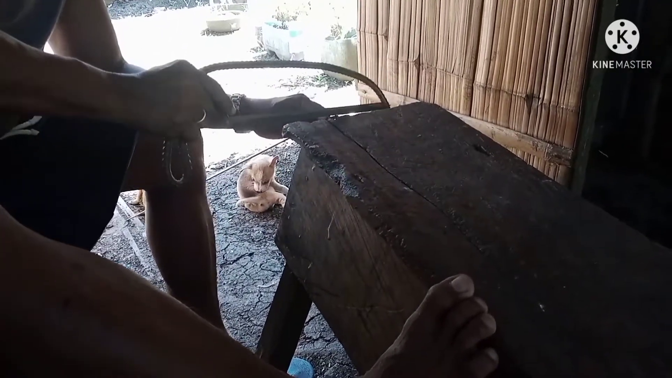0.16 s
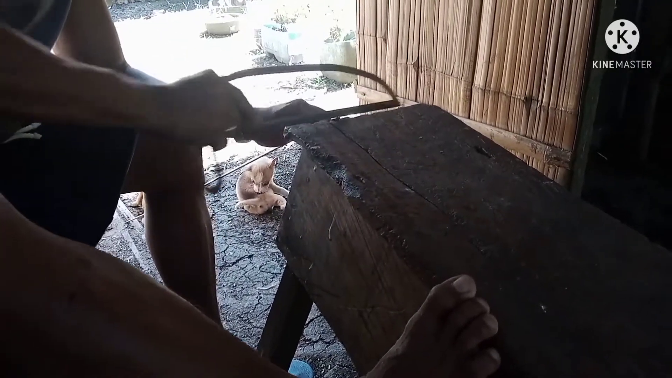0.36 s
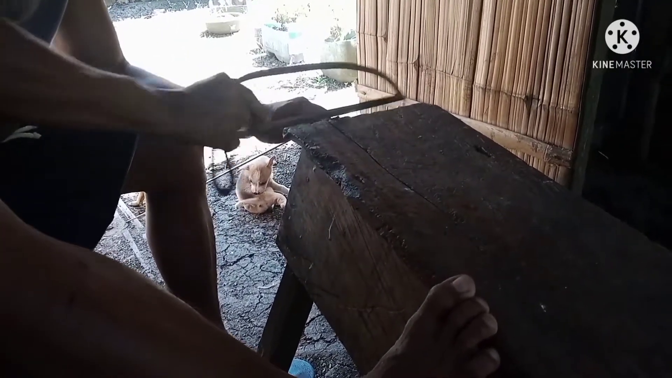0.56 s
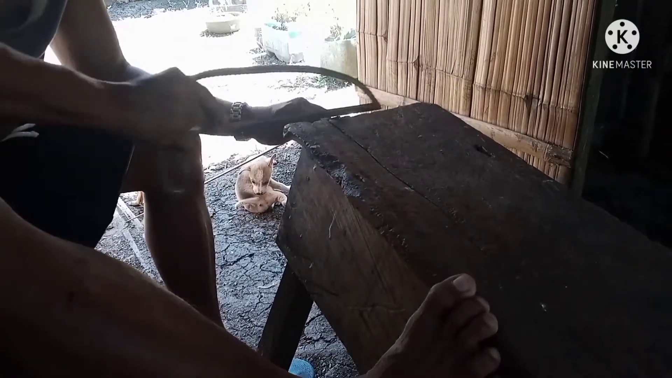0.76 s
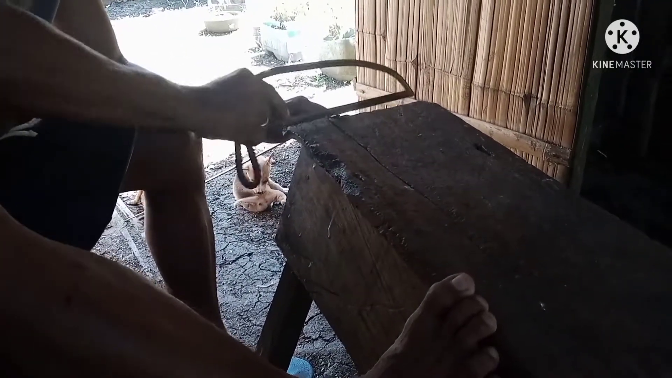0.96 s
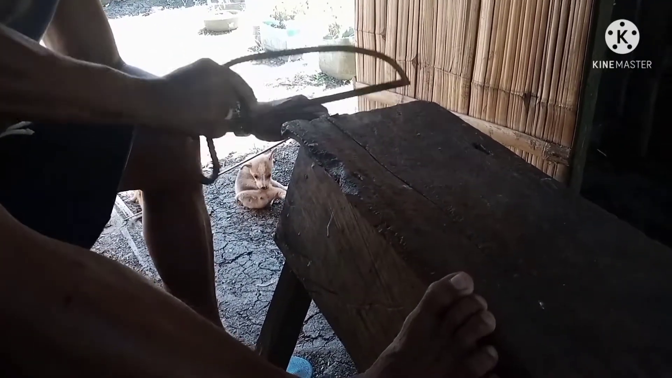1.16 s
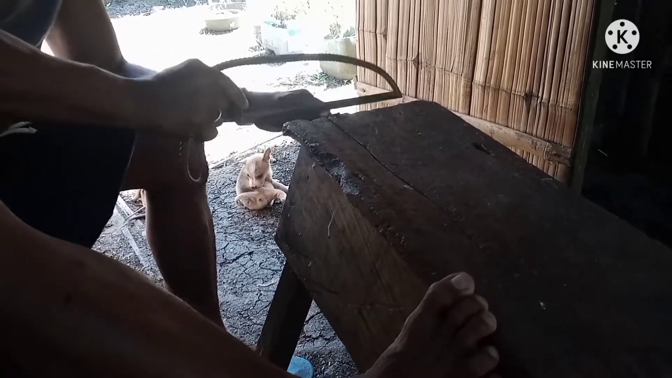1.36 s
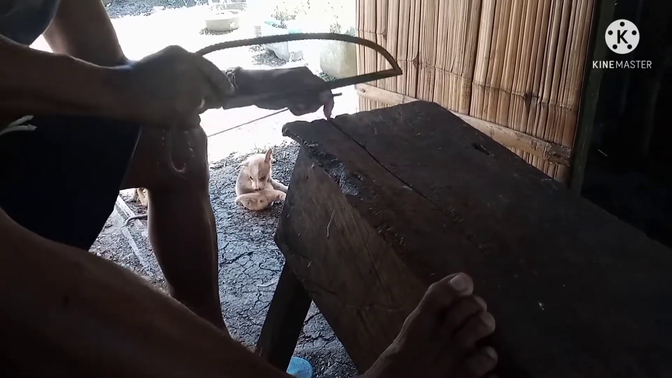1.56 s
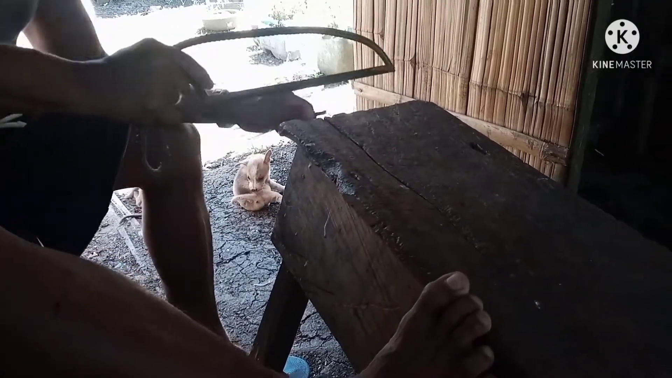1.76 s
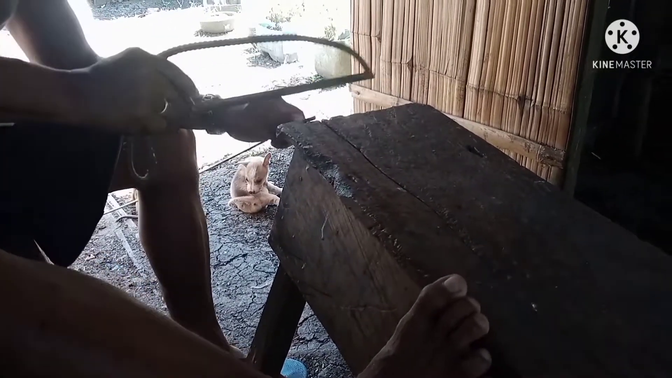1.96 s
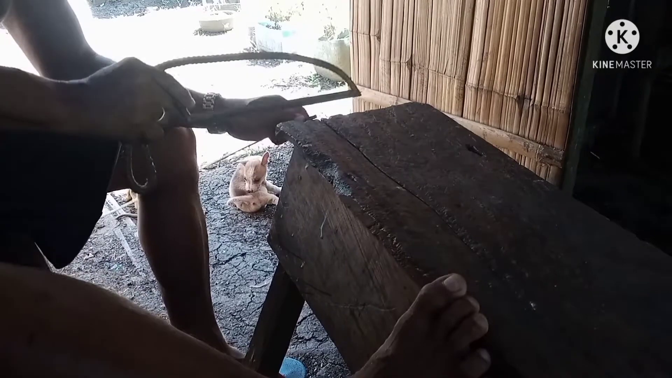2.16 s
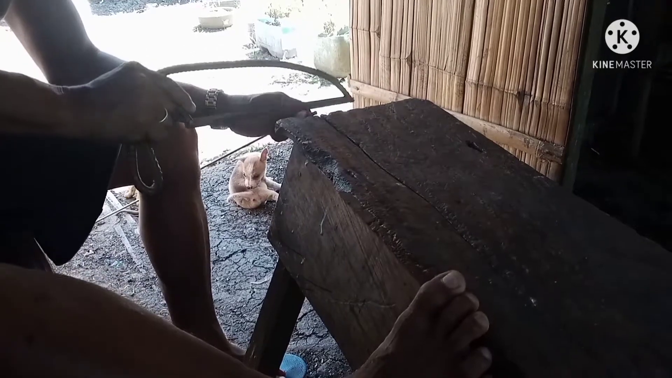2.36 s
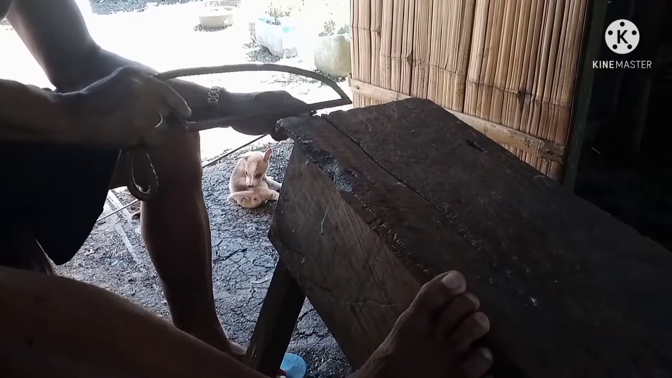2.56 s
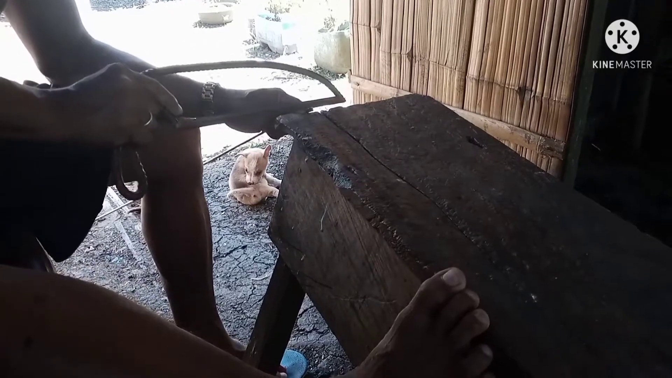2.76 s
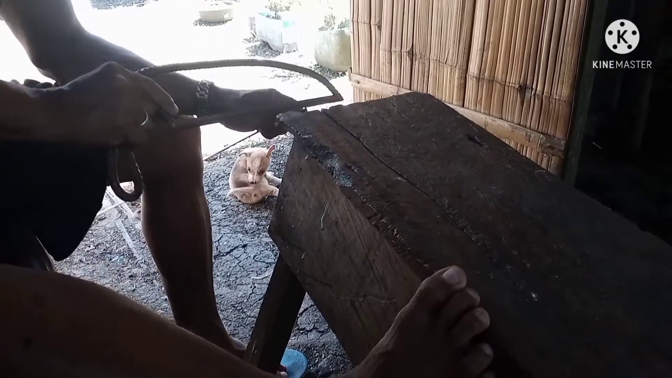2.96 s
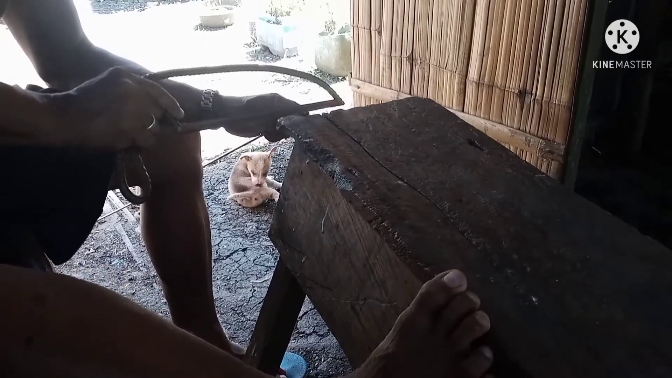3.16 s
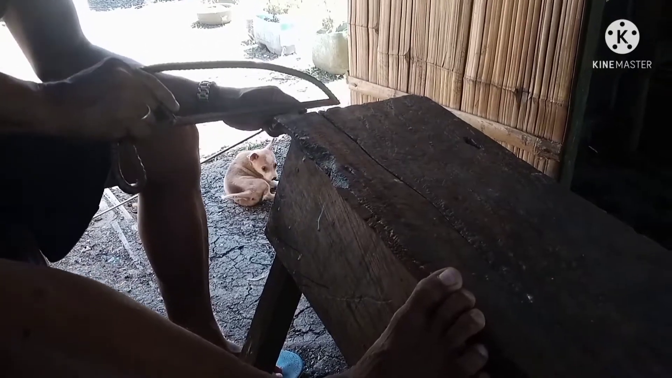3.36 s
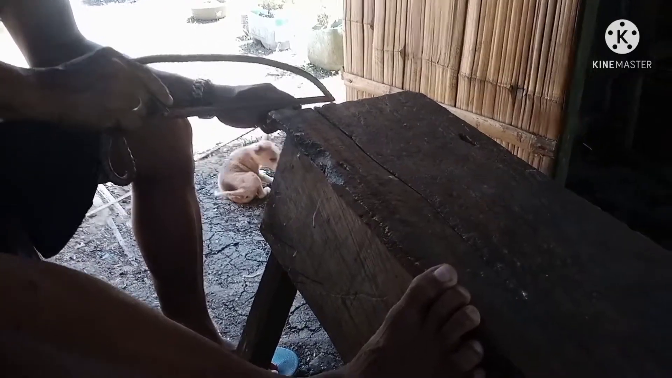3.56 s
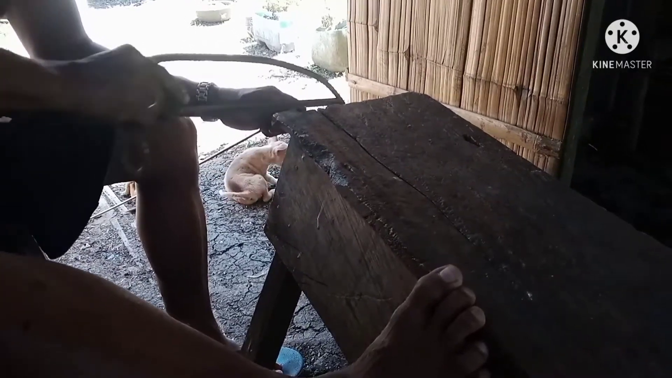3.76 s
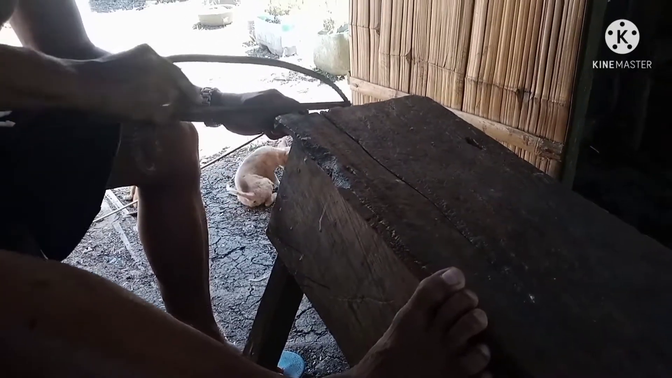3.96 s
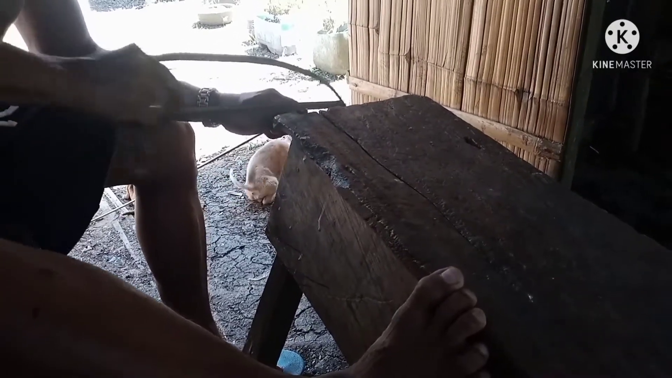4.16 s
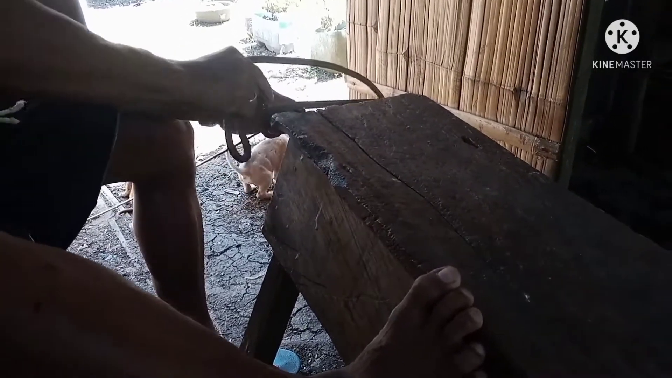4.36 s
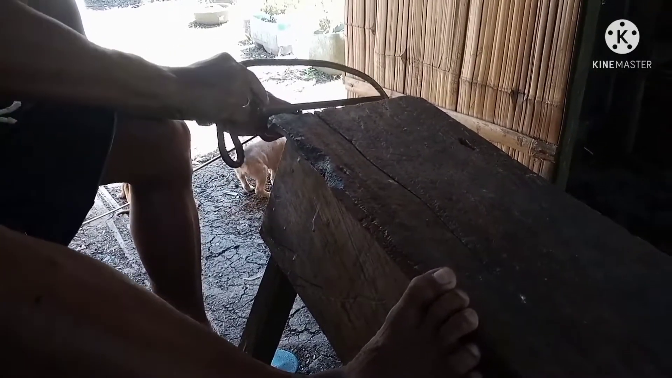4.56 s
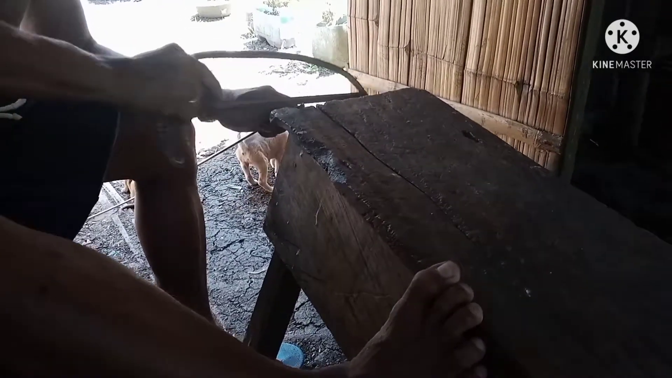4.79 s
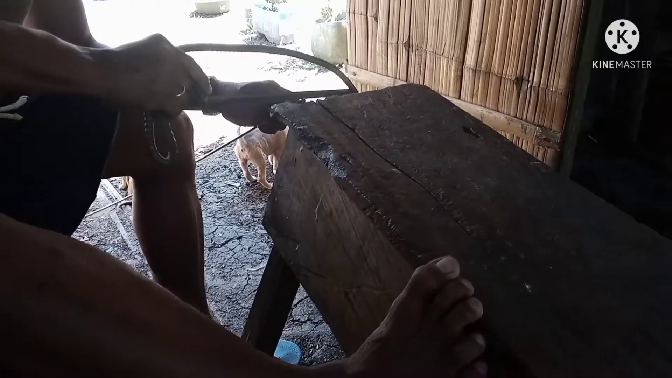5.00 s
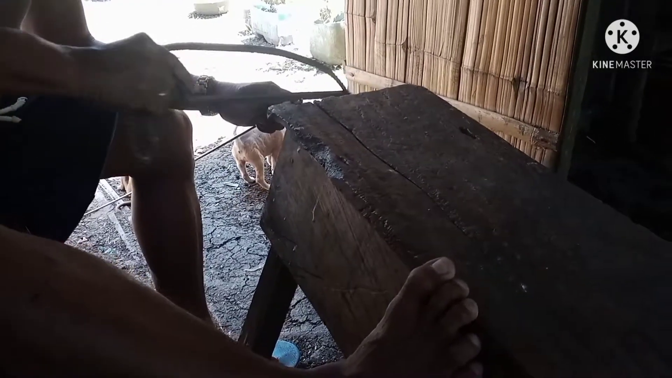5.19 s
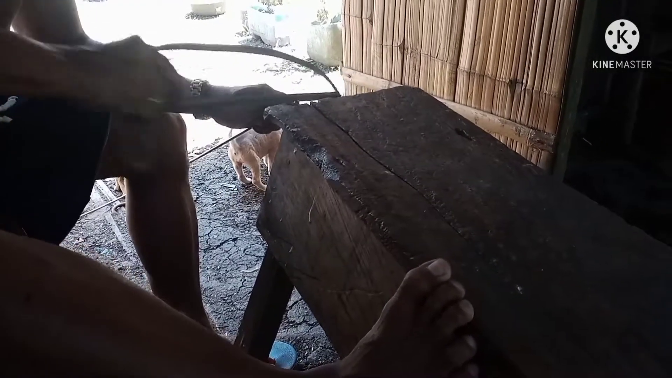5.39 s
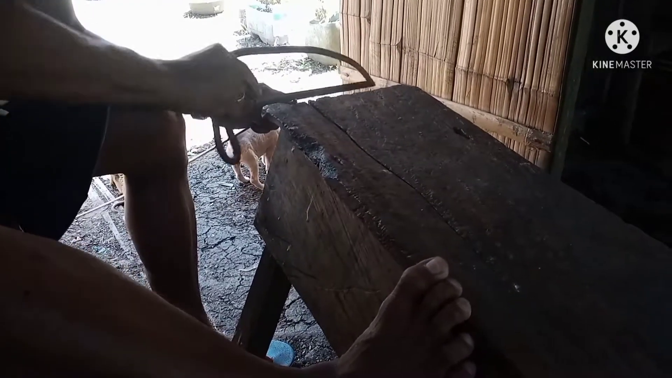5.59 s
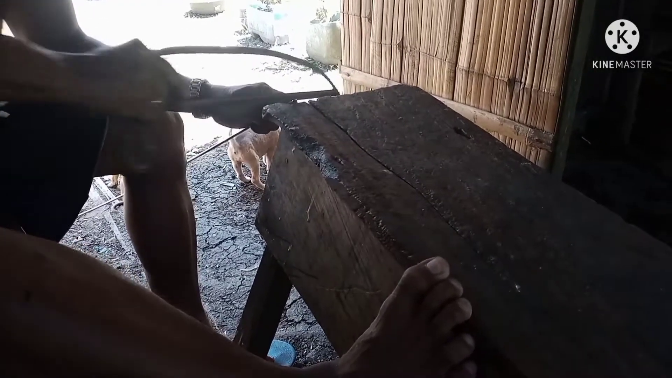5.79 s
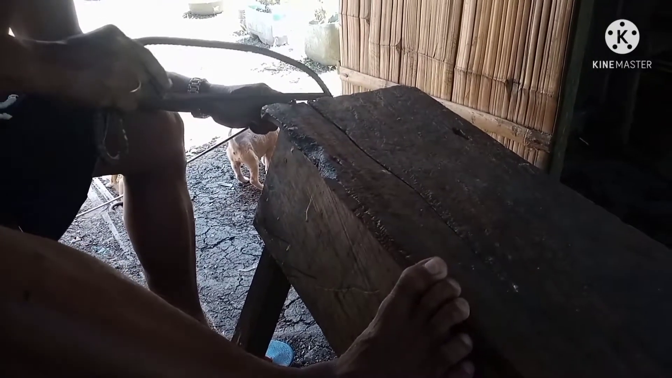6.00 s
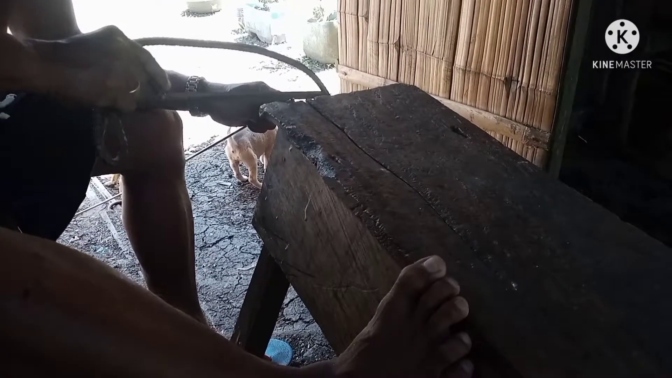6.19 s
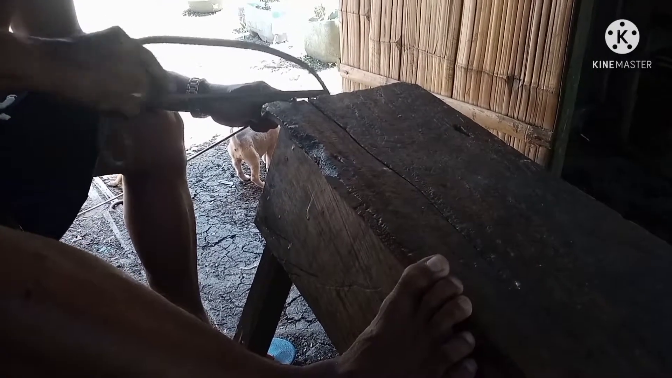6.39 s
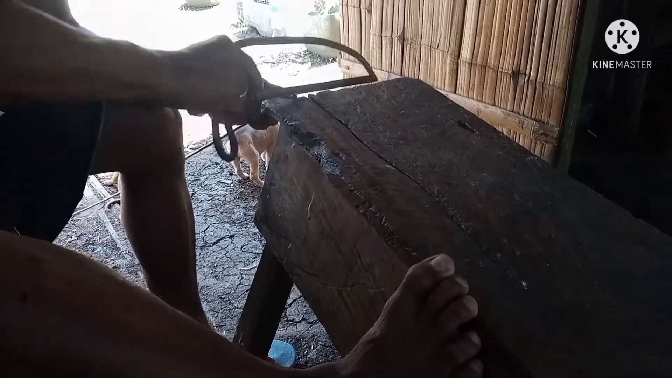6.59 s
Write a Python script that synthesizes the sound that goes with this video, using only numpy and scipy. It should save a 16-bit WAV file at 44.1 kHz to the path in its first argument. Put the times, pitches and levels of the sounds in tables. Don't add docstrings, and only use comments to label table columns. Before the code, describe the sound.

Close, gritty metal sawing in short uneven strokes, a quiet gap with clinks and wooden taps, then longer cutting over faint insect hiss.

```python
import sys
import numpy as np
from scipy import signal
from scipy.fft import rfft, irfft, next_fast_len
from scipy.io import wavfile
from scipy.ndimage import uniform_filter1d, map_coordinates

SR = 44100
rng = np.random.default_rng(int(sys.argv[2]) if len(sys.argv) > 2 else 0)


def boost(x):
    u = np.asarray(x, float) / 20
    return 10 ** u


def transcribe(u):
    v = np.clip(np.atleast_2d(u).T, -1, 1)
    q = np.round(v * 32767).astype(np.int16)
    wavfile.write(sys.argv[1], SR, q)


N = 292824
TOP_HZ = 15500
FIRST_ENDS_S, SECOND_STARTS_S = 1.5, 3.8

# [freq_hz, width_hz, level_db]
BENCH_MODES = [(168, 26, -8), (220, 40, -19), (308, 20, -11.5), (412, 25, 1.5), (454, 24, 4),
               (520, 20, -11), (573, 24, -6.5)]


def saw():
    t = np.arange(N) / SR
    stage = np.digitize(t, [FIRST_ENDS_S, SECOND_STARTS_S])
    first = stage == 0

    blade_db, rod_db, bench_db, fizz_db, upper_db = hand()
    rod_db, fizz_db, upper_db = rod_db - blade_db, fizz_db - blade_db, upper_db - blade_db
    catch_db = catching()
    bench_db = uniform_filter1d(bench_db, size=500)
    bench_db = bench_db - 2.0 + 0.34 * uniform_filter1d(catch_db, size=250) + 3.2 * wobble(30)
    blade_db = blade_db + catch_db + 1.1 * wobble(40)
    fizz_db = fizz_db + 1.5 * wobble(20)

    teeth_per_s = np.where(first, 230, 310) * boost(1.8 * wobble(60))
    caught = np.flatnonzero(np.diff(np.floor(np.cumsum(teeth_per_s) / SR)))
    bite_db = np.where(first, 3.4, 2.8)
    teeth = np.zeros(N)
    teeth[caught] = boost(bite_db * np.minimum(rng.exponential(size=N), 1.6))[caught]
    bursts = np.convolve(teeth, boost(-60 * t[:300] / .004))[:N]
    grinding = np.where(first, .42, .27)
    force = (bursts + grinding) * rng.standard_normal(N)
    force = patchy(force, depth_db=1.7, bins=3, frames=14)
    force = patchy(force, depth_db=1.9, bins=9, frames=5)

    blade, upper, rod, fizz = steel(force, stage)
    bench = even(bent(filtered(force, body(BENCH_MODES, 130, 620, between_db=-34)), share=.005))
    metal = blade + boost(upper_db) * upper + boost(rod_db) * rod + boost(fizz_db) * fizz
    return boost(blade_db) * metal + boost(bench_db) * bench


# [freq_hz, density_db per Hz]
SCRAPE_SPECTRUM = [(350, -42.5), (600, -8.5), (660, -5.5), (942, -6.5), (1220, -9), (2200, -8), (2590, 0),
                   (2850, -8.5), (3220, 0), (4350, -11), (6200, -5.5), (8490, -24), (13300, -41),
                   (15200, -30)]
# [freq_hz, width_hz, level_db]
BLADE_MODES = [
    [(2510, 57, -1.5), (3170, 110, 2), (3530, 70, -1.5), (4000, 140, -0.5), (4550, 68, -2),
     (4970, 150, 3.5), (5520, 120, 5), (6156, 27, 7.5), (6900, 73, -2), (8820, 400, -25), (9100, 160, -5.5),
     (9840, 130, -2), (11600, 170, -22)],
    [(2290, 95, 6), (2707, 53, 3), (3200, 46, 1), (3350, 67, -19), (4610, 100, 1.5), (4940, 32, 1.5),
     (5180, 40, -7), (6063, 67, 4.5), (6485, 220, 1), (7500, 66.6, -7.5), (7650, 92, -0.5), (9250, 120, 2),
     (9950, 120, -2), (11430, 200, 0)],
]
# [freq_hz, width_hz, level_db]
LOOSE_MODES = [(2690, 230, -2), (4570, 570, 1.5), (5950, 480, 5), (6530, 270, -0.5), (8150, 200, -3),
               (8800, 250, -1), (9900, 500, 0)]
# [freq_hz, width_hz, level_db]
ROD_MODES = [
    [(959.5, 16, 5.5), (1343, 9.2, -13), (1522, 11, 4.5), (1680, 150, -4.5), (2060, 30, 5.5)],
    [(777, 120, -0.5), (982.6, 30, 4.5), (1122, 39, 2), (1570, 44, -11), (1788, 170, 0.1), (1982, 160, -1)],
]


def steel(force, stage):
    force = coloured(force, SCRAPE_SPECTRUM)
    blade_sets = (BLADE_MODES[0], -4.5), (LOOSE_MODES, -12), (BLADE_MODES[1], -5.5)
    answers = [unit(filtered(force, body(modes, 3000, TOP_HZ, between_db))) for modes, between_db in blade_sets]
    blade = bent(np.choose(stage, answers), share=.004)
    fizz = filtered(blade, lambda hz: 1 - 1 / (1 + (hz / 7700) ** 10))
    blade = blade - fizz
    fizz /= abs(uniform_filter1d(fizz ** 2, size=90)) ** .15 + 1e-9
    upper = filtered(blade, lambda hz: 1 - 1 / (1 + (hz / 4300) ** 8))
    size = smooth_rms(blade)
    rods = [unit(filtered(force, body(modes, 700, 2300, between_db=-8))) for modes in ROD_MODES]
    rod = bent(np.where(stage, rods[1], rods[0]), share=0.00818)
    return (blade - upper) / size, upper / size, even(rod), even(fizz)


# [start_s, length_s, blade_db at mid-stroke, gain_db start to end, bench_db re blade]
STROKES = [(0.457, 0.2, -16.5, 2.5, -19), (0.628, 0.29, -22, 9, -10.5), (0.902, 0.22, -19.5, 1.5, -15.5),
           (1.15, 0.096, -24, -30.5, -17.5), (3.822, 0.24, -32, 3.5, -1.5), (4.048, 0.26, -32.5, 3, 0),
           (4.242, .29, -24.5, 2.5, -2), (4.754, 0.36, -27, 0.5, 1.5), (5.282, 0.27, -31, -8, -3.5),
           (5.494, 0.25, -25, 5.5, -4), (5.753, 0.41, -26.5, -15, -1), (6.114, 0.2, -45.5, -34.5, -3.5),
           (6.299, 0.2, -33, -2.5, -1), (6.49, 0.33, -21.5, 9, -4.5)]
# [rod_db, upper_blade_db, fizz_db]
LEANS = [(-1.5, -1, -2.5), (2, -1, 3), (0.5, -1.5, 2), (-4, -4, -0.7), (2.5, -2, -1), (1.5, 0.5, 3),
         (1.5, 0, 0.7), (1.5, 1, 1), (-0.5, -1.5, 2), (2, -1, -1), (0, -2.5, 1.5), (0.5, -5.5, -2.5),
         (-1.5, -4.5, -1.5), (-1, -5, -5)]
# [start_s, length_s, blade_db, rod_db re blade, bench_db re blade]
SCUFFS = [(0.0, 0.07, -56.5, 1.5, -2), (0.202, 0.045, -38.5, 3.5, 0), (0.279, 0.029, -41.5, -4, -4),
          (0.407, 0.013, -38.5, 6.5, 0), (0.484, 0.028, -48, -4, -6), (1.062, 0.1, -47.5, 9, 10.5),
          (2.561, 0.1, -50.5, -8.5, 0), (2.715, 0.037, -59, -19, -17), (2.763, 0.045, -59, -19, -10),
          (2.864, 0.36, -57.5, -11, -5), (2.992, 0.089, -36.5, -11.5, -12.5),
          (3.045, 0.062, -46.5, -2.5, 0), (3.117, 0.11, -69, 10.5, 9), (3.188, 0.23, -64.5, -1.5, 4),
          (3.313, 0.11, -55.5, -6.5, -27), (3.328, 0.17, -59.5, -1.5, 3), (3.485, 0.12, -63, 3.5, 11.5),
          (3.6, 0.06, -61, -4, 10), (3.623, 0.094, -64, 6.5, 12), (3.718, 0.05, -53.5, 4, 14),
          (4.52, 0.098, -63, 4.5, -2), (4.725, .03, -67, 4, 15), (5.112, 0.03, -52.5, -1, -8),
          (5.189, 0.036, -54, 4, 13), (5.249, 0.018, -62, 15, 26)]
TURN_DB, SPEED_UP_S, SLOW_DOWN_S, ARCH_DB = 33.5, 0.019, 0.027, 6.5
ROD_DB, FIZZ_DB = (-9, -3), (-25, -14.5)
ROD_SWING, BENCH_SWING, FIZZ_SWING = 0.83, 0.5, 1.25
SCUFF_RISE_S, SCUFF_FADE_DB, SCUFF_FIZZ_DB = .007, 19, -7.5


def hand():
    power = np.full((5, N), 1e-12)
    swing = np.array([[1], [ROD_SWING], [BENCH_SWING], [FIZZ_SWING], [1]])
    for (s, length, db, gain_db, bench_db), (rod_db, upper_db, fizz_db) in zip(STROKES, LEANS):
        at = np.arange(round(s * SR) - 2000, min(round((s + length) * SR) + 4000, N))
        t, cut = at / SR - s, int(s > SECOND_STARTS_S)
        turn_db = TURN_DB * (np.exp(-t / SPEED_UP_S) + np.exp((t - length) / SLOW_DOWN_S))
        turn_db += ARCH_DB * (2 * t / length - 1) ** 2
        offset_db = np.array([[0], [ROD_DB[cut] + rod_db], [bench_db], [FIZZ_DB[cut] + fizz_db], [upper_db]])
        power[:, at] += boost(db + gain_db * (t / length - .5) + offset_db - swing * turn_db) ** 2
    for s, length, db, rod_db, bench_db in SCUFFS:
        t = np.arange(round(3 * length * SR)) / SR
        shape = (1 - np.exp(-t / SCUFF_RISE_S)) * boost(db - SCUFF_FADE_DB * (t / length) ** 1.96)
        offset_db = [[0], [rod_db], [bench_db], [SCUFF_FIZZ_DB], [0]]
        power[:, round(s * SR):][:, :len(t)] += (boost(offset_db) * shape) ** 2
    return 10 * np.log10(power)


# [bite_s, dip_db, lift_length_s]
SKIPS = [(.486, -30, 0.0091), (0.747, -11, 0.021), (1.164, -5.5, 0.016), (3.851, -42, 0.07),
         (4.263, -6.5, 0.056), (4.954, -17, 0.022), (4.928, -7, .012), (4.9795, -16, 0.014),
         (4.992, -8, .008), (4.852, -5, .008), (.664, -14, .02), (.924, -13, .015), (4.262, -6, .01),
         (6.072, -20, 0.0068), (6.089, -3, .01), (5.84, -10.5, 0.0091), (5.017, -14, 0.022),
         (5.05, -8, 0.0045), (5.078, -18, 0.011), (5.508, -19, 0.024), (5.772, -12, 0.0096),
         (5.813, -15, 0.038), (5.864, -20, 0.022), (5.892, -10.5, 0.015), (6.106, -11, 0.019),
         (6.354, -5, 0.024)]
# [start_s, extra_db, dying_time_s]
GRIPS = [(.505, 5, 0.0039), (.543, -1.5, 0.011), (.707, 0, 0.0088), (0.819, 4.5, 0.0044), (.95, 0, 0.0089),
         (0.99, 4, .008), (1.04, 4.5, 0.016), (1.178, 4, 0.02), (3.871, 3, 0.0057), (4.079, -1.5, .008),
         (4.1, 4, 0.0093), (4.229, 6.5, 0.0063), (4.296, 1.5, 0.0069), (4.35, 3, 0.011),
         (4.374, 2.5, 0.019), (4.402, 1.5, 0.0059), (4.443, 0, 0.009), (4.781, 3, 0.0038),
         (4.788, -0.5, .005), (4.802, -2, 0.0072), (4.837, -1.5, .006), (4.862, 2, .005), (4.877, 1, .006),
         (5.053, 1.5, 0.0055), (4.853, 1.5, 0.012), (4.885, -1, 0.011), (4.908, 2.5, 0.0062),
         (4.959, 5, 0.0087), (4.995, 2.5, 0.0065), (5.03, 5.5, 0.017), (5.845, 3.5, .008),
         (5.325, 5, 0.007), (5.361, -1, 0.0042), (5.393, 5, 0.01), (5.549, 4, 0.011), (5.586, 5, 0.014),
         (5.611, 6, 0.0069), (5.635, 6.5, 0.0066), (5.642, 5.5, .005), (5.67, -3, 0.006),
         (5.792, 8, 0.0091), (5.899, 3.5, 0.0093), (5.926, 3, 0.013), (5.96, 2, 0.014), (6.15, 8, 0.013),
         (6.376, 7, 0.0041), (6.425, 3.5, 0.0087), (6.524, 4, .008), (6.543, 6.5, 0.018), (6.61, 0, 0.0078)]
BITE_OVER, BITE_S = .22, 0.005


def catching():
    out = np.zeros(N)
    at = np.arange(-4000, 2000)
    t = at / SR
    for s, dip_db, length in SKIPS:
        lift = np.clip(1 + t / length, 0, 1) ** .5
        bite = -BITE_OVER * np.exp(-abs(t) / BITE_S)
        out[at + round(s * SR)] += dip_db * np.where(t < 0, lift, bite)
    t = np.arange(3000) / SR
    for s, db, length in GRIPS:
        swell_db = db * (1 - np.exp(-t / 0.0012)) * np.exp(-(t / length) ** 2)
        out[round(s * SR):][:len(t)] += swell_db[:N - round(s * SR)]
    return out


# [start_s, length_s,
# pitch_hz, level_db]
SQUEALS = [(0.815, 0.065, 965, -32), (0.925, 0.035, 2587, -33), (1.027, 0.069, 974, -33),
           (1.167, 0.051, 970, -41), (2.99, 0.036, 2630, -45), (3.06, 0.02, 2750, -60),
           (6.25, .05, 1130, -67), (2.569, .025, 8100, -60), (2.569, .02, 9700, -63),
           (2.569, .015, 11600, -69), (5.575, .075, 1740, -33), (5.6, .08, 3420, -33),
           (4.83, .08, 3200, -36), (5.385, .03, 6050, -36), (6.55, .05, 2600, -34), (1.715, .02, 1750, -65),
           (2.575, .035, 6200, -52), (4.2, .035, 7360, -53), (4.21, .035, 8050, -49),
           (4.212, .04, 8850, -51), (4.222, .02, 6400, -36)]


def squeals():
    out = np.zeros(N)
    flutter, drift = boost(4 * wobble(110)), 1.2 * wobble(90)
    for s, length, hz, db in SQUEALS:
        at = np.arange(round(s * SR), round((s + length) * SR))
        shape = np.hanning(len(at)) ** 0.19 * flutter[at]
        out[at] += boost(db + 5.0) * shape * np.sin(2 * np.pi * hz * at / SR + drift[at])
    return out


# [start_s, peak_db, rod_db re peak, bench_db re peak]
KNOCKS = [(0.047, -38, 2, -39), (0.2055, -38, 8, -23), (0.2184, -20.5, -41, -8.5), (0.2829, -29, -8.5, -23),
          (0.412, -28.5, 1, -15.5), (0.4862, -12.5, -17, -17.5), (1.2448, -39.5, -7, -42),
          (1.724, -42.5, -2, -12), (1.701, -64.5, -2, 4), (1.757, -51, 0, -6), (1.864, -44, -41, -40),
          (1.9636, -39.5, 12, -9), (1.9812, -34, 14, -3), (2.008, -45.5, 15, 15.5), (2.0267, -39.5, 10, 5),
          (2.046, -52.5, 11, 10.5), (2.194, -43.5, 15, 12.5), (2.203, -53, 8, 17), (2.2153, -44.5, 3, 9),
          (2.255, -25.5, -3, -17), (2.389, -48, 18.5, 15.5), (2.402, -52, 5.5, 18),
          (2.813, -56.5, -0.5, -7), (2.885, -63.5, 2, 13.5), (3.067, -35.5, 2, -3), (3.124, -54, 18, 2),
          (3.265, -58, 3, 2), (3.328, -52, 2, -2), (3.498, -63, 2, 7), (3.617, -61, 8, 0),
          (3.633, -51, 3, -4), (2.5708, -27, -44, -18), (2.7227, -42.5, -38, -11), (2.7717, -43, -36, -42),
          (3.001, -40, -26, -22), (3.0098, -28, -33, -43), (3.7331, -17, -18, -22.5),
          (3.753, -28.5, -4, -44), (5.118, -32.5, 11.5, -11), (5.188, -50, 9, -27),
          (5.2882, -41.5, 18.5, -24), (6.322, -29, -9, -38)]
# [freq_hz, width_hz, level_db]
PLANK_MODES = [(145, 14, 3), (178, 18, 2), (300, 50, -10), (410, 42, -1), (460, 42, 0), (575, 60, -7),
               (850, 120, -15)]


def knocks():
    t = np.arange(900) / SR
    t60_s = np.array([[.01], [.025], [.03]])
    rise_s = np.array([[.0002], [.0005], [.002]])
    shape = boost(-60 * t / t60_s) * (1 - np.exp(-t / rise_s))
    blows = np.zeros((3, N + 900))
    for s, db, rod_db, bench_db in KNOCKS:
        crack = rng.standard_normal((3, 900)) * shape
        crack /= np.linalg.norm(crack, axis=1)[:, None]
        blows[:, round(s * SR):][:, :900] += boost([[db], [db + rod_db], [db + bench_db]]) * crack
    blade = filtered(coloured(blows[0], SCRAPE_SPECTRUM), body(LOOSE_MODES, 2700, 11500, between_db=-8))
    rod_body = body(ROD_MODES[1], 600, 3000, between_db=0)
    rod = filtered(blows[1, :N], lambda hz: rod_body(hz) / (1 + 1j * hz / 900))
    bench = filtered(blows[2, :N], body(PLANK_MODES, 91, 1200, between_db=-27.0))
    return boost(22.0) * blade + boost(12.0) * rod + boost(21.5) * bench


# [start_s, length_s, top_pitch_hz, level_db, final_drop_hz]
PEEPS = [(.17, 0.048, 3500, -67, 0), (1.245, .022, 4400, -65, 150), (1.266, .045, 4520, -63, 60),
         (1.386, .04, 4420, -66, 250), (1.41, .042, 4530, -63, 500), (1.625, 0.165, 3720, -66, 1000),
         (1.862, .05, 3800, -69, 350), (2.02, 0.15, 3900, -62, 1200), (2.45, 0.14, 3890, -57, 700),
         (2.7, 0.04, 4000, -67, 500), (2.832, 0.155, 3920, -57.5, 1100), (3.185, 0.07, 3200, -72, 0),
         (3.372, .1, 3720, -64, 20), (3.46, .08, 3820, -63, 400), (3.815, 0.051, 3750, -63, 2),
         (4.528, .058, 3850, -61, 150), (4.595, .088, 3900, -61, 1400)]
RISE_HZ, RISE_SHARE, FALL_S, PLUNGE, WAVER_HZ = 380, .075, .042, .35, 30
OVERTONE_DB, BREAKS_DB = -9, 2.8


def chicks():
    out, waver = np.zeros(N), WAVER_HZ * wobble(45)
    for s, length, top_hz, db, drop_hz in PEEPS:
        t = np.arange(round(length * SR)) / SR
        start = round(s * SR)
        fall = np.clip(1 - (length - t) / min(FALL_S, length / 2), 0, 1)
        hz = top_hz - RISE_HZ * np.exp(-t / (RISE_SHARE * length))
        hz = hz - drop_hz * (1 - np.exp(-fall / PLUNGE)) + waver[start:][:len(t)]
        shape = np.sin(np.pi * t / length) ** .35 * (1 - .42 * fall ** .3)
        phase = 2 * np.pi * np.cumsum(hz) / SR
        overtone = boost(OVERTONE_DB) * drop_hz / 500 * fall ** 0.37 * np.sin(2 * phase)
        out[start:][:len(t)] += np.sqrt(2) * boost(db) * shape * (np.sin(phase) + overtone)
    return out * boost(BREAKS_DB * wobble(75))


# [start_s, level_db]
JOLTS = [(0.0, -53.5), (.22, -66), (.31, -46), (.47, -51), (.65, -48), (.92, -41.5), (1.07, -44),
         (1.72, -65), (2.029, -63.5), (2.415, -51.5), (2.58, -58), (3.06, -57), (3.3, -67), (3.45, -64),
         (3.78, -78), (4.251, -44), (4.48, -50.5), (5.069, -39), (5.24, -68), (5.85, -45), (6.1, -42),
         (6.4, -44.5)]
JOLT_RISE_S, JOLT_T60_S, SHAKE_DB, STILL_DB = 0.012, 0.36, -28, -86


def shaking():
    t = np.arange(0, N, 64) / SR
    jolts = np.zeros(len(t))
    for s, db in JOLTS:
        fall_db = np.where(t < s, 1.7 * ((t - s) / JOLT_RISE_S) ** 2, 60 * (t - s) / JOLT_T60_S)
        jolts += boost(db - fall_db) ** 2
    sawing = abs(uniform_filter1d(boost(hand()[0] + SHAKE_DB) ** 2, size=4000))
    return np.sqrt(boost(STILL_DB) ** 2 + sawing + np.interp(np.arange(N) / SR, t, jolts))


# [freq_hz, density_db per Hz]
YARD_SPECTRUM = [(35, -23.5), (65, -2.5), (260, -20.5), (1230, -19), (1920, -18.5), (2920, -9.5),
                 (3800, -12), (4830, -9), (5790, -1), (6600, -0.5), (8310, -26), (9950, -20.5),
                 (13500, -38.5), (15300, -35.5)]
# [freq_hz, depth_db]
YARD_PATCHES = [
    (300, 7),
    (1800, 6.5),
    (3500, 2.5),
    (4500, 2),
    (5500, 0),
]
# [freq_hz, density_db per Hz]
RUMBLE_SPECTRUM = [(20, -32), (45, -20.5), (75, -9.5), (115, 1.5), (175, -3.5), (225, -52.5)]
YARD_DB = -60


def yard():
    depth_db = along(YARD_PATCHES, np.linspace(0, SR / 2, 129))[:, None]
    hiss = patchy(rng.standard_normal(N), depth_db, bins=3, frames=24)
    hiss = unit(filtered(hiss, lambda hz: boost(along(YARD_SPECTRUM, hz))))
    low = unit(filtered(rng.standard_normal(N), lambda hz: boost(along(RUMBLE_SPECTRUM, hz))))
    return boost(YARD_DB + 0.51 * wobble(2.6)) * hiss + shaking() * low


# [freq_hz, t60_s]
BENCH_ECHO = [(200, 0.22), (2000, 0.12), (10000, 0.053)]
# [freq_hz, t60_s]
YARD_ECHO = [(2000, 0.2), (8000, 0.27)]


def echo(x, walls):
    hz, t, z = signal.stft(rng.standard_normal(SR // 4), SR, nperseg=256)
    tail = signal.istft(z * boost(-60 * t / along(walls, hz)[:, None]), SR, nperseg=256)[1]
    return signal.fftconvolve(np.pad(x, (150, 0)), tail / np.linalg.norm(tail))[:N]


def body(modes, lo_hz, hi_hz, between_db):
    def response(f):
        power = boost(2 * between_db)
        for c, w, db in modes:
            power = power + boost(2 * db) * (f * w) ** 2 / ((c * c - f * f) ** 2 + (f * w) ** 2)
        gain = np.sqrt(power / (1 + (lo_hz / (f + 1)) ** 6) / (1 + (f / hi_hz) ** 6))
        return causal(gain / np.sqrt(np.mean(gain ** 2)))
    return response


def causal(gain):
    cepstrum = irfft(np.log(gain + 1e-6))
    cepstrum[1:len(gain) - 1] *= 2
    cepstrum[len(gain):] = 0
    return np.exp(rfft(cepstrum))


def filtered(x, response):
    m = next_fast_len(N + SR // 2)
    return irfft(rfft(x, m) * response(np.fft.rfftfreq(m, 1 / SR)), m)[..., :N]


def coloured(x, spectrum):
    return filtered(x, lambda hz: causal(boost(along(spectrum, hz))))


def along(points, hz):
    f, v = np.transpose(points)
    return np.interp(np.log(hz + 1), np.log(f + 1), v)


def bent(x, share):
    return map_coordinates(x, [np.arange(N) + share * SR / 9 * wobble(8)], mode="nearest")


def patchy(x, depth_db, bins, frames):
    z = signal.stft(x, nperseg=256)[2]
    field = uniform_filter1d(rng.standard_normal(z.shape), size=bins, axis=0)
    field = uniform_filter1d(field, size=frames, axis=1)
    return signal.istft(z * boost(depth_db * unit(field)), nperseg=256)[1][:N]


def wobble(rate):
    return map_coordinates(rng.standard_normal(int(N * rate / SR) + 4), [np.arange(N) * rate / SR])


def smooth_rms(x):
    return np.sqrt(abs(uniform_filter1d(uniform_filter1d(x ** 2, size=1200), size=1200)) + 1e-12)


def even(x):
    return x / smooth_rms(x)


def unit(x):
    return x / np.sqrt(np.mean(x ** 2) + 1e-20)


def scene():
    near, birds = saw() + squeals() + knocks(), chicks()
    near = near + boost(-11) * echo(near, BENCH_ECHO)
    birds = birds + boost(-4) * echo(birds, YARD_ECHO)
    return (near + birds + yard())[None]


def roll_off(x):
    return signal.sosfilt(signal.butter(12, 16810, fs=SR, output="sos"), x)


def record(dry):
    held = dry / (1 + abs(dry / .5) ** 4) ** (1 / 4)
    mix = filtered(held, lambda hz: hz < TOP_HZ)
    return roll_off(mix)


dry = scene()
out = record(dry)
transcribe(out)
```